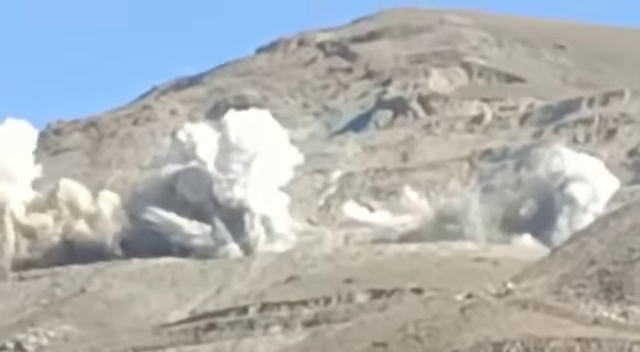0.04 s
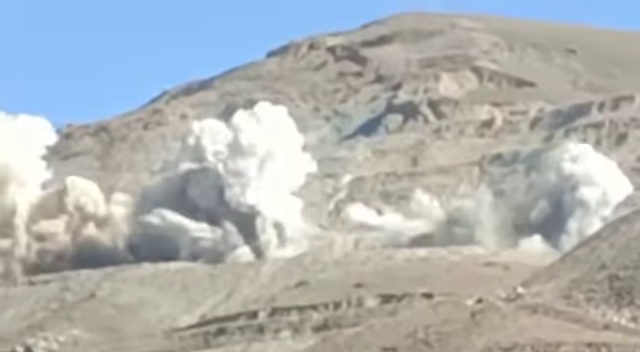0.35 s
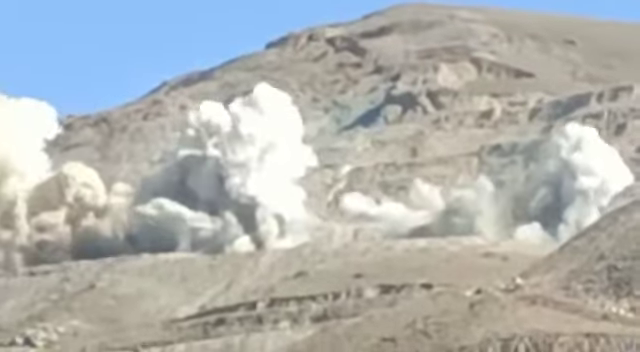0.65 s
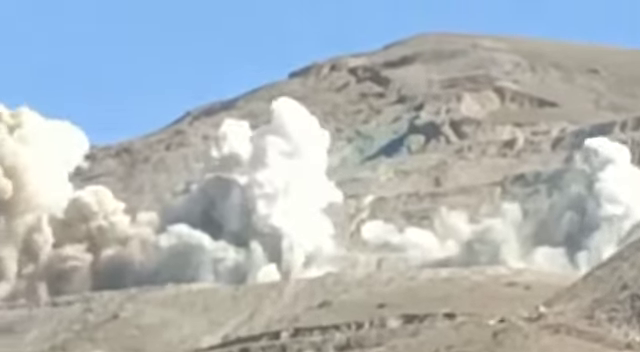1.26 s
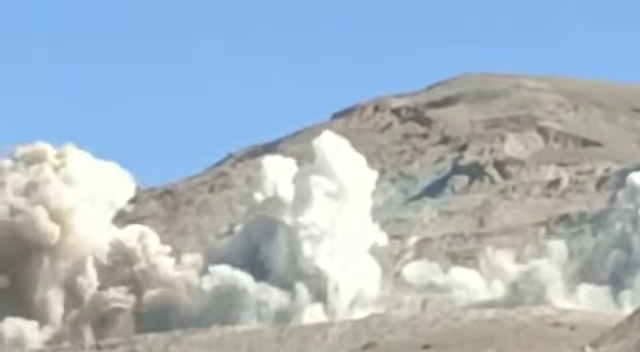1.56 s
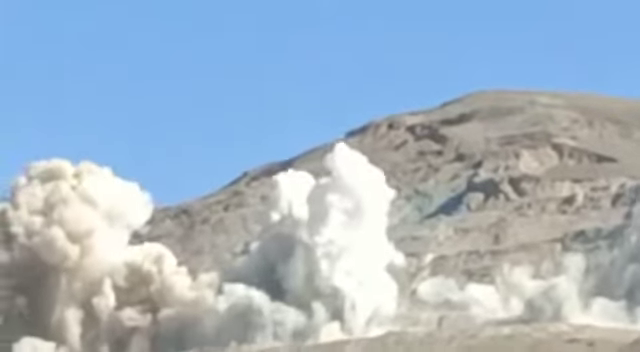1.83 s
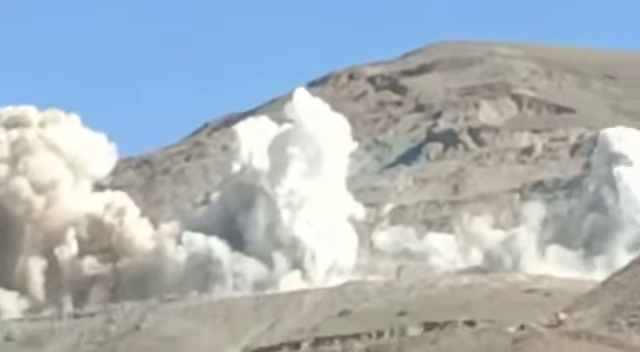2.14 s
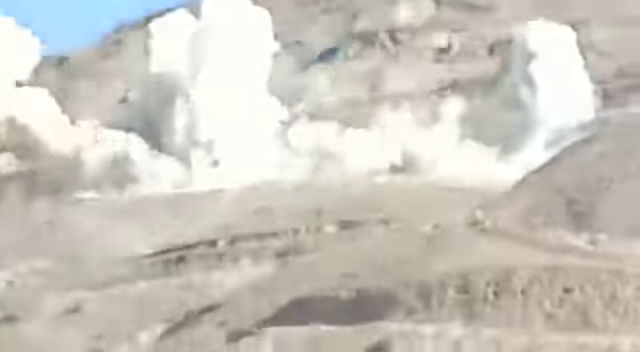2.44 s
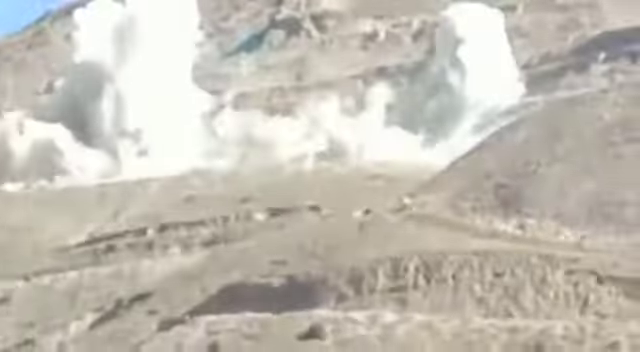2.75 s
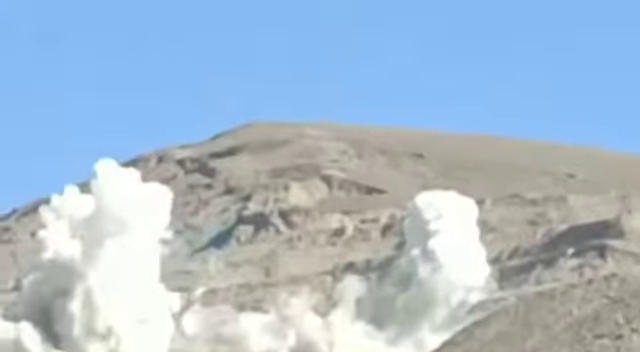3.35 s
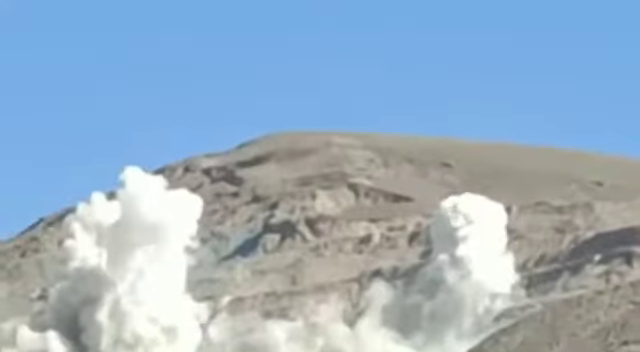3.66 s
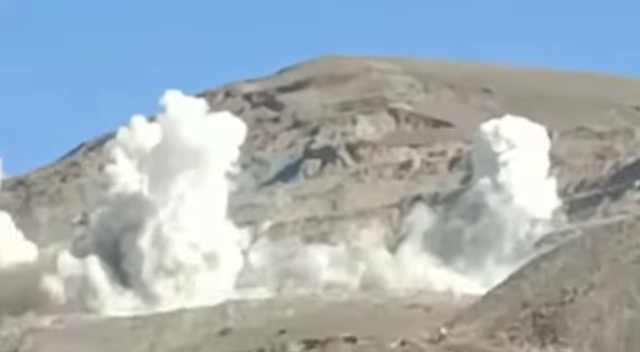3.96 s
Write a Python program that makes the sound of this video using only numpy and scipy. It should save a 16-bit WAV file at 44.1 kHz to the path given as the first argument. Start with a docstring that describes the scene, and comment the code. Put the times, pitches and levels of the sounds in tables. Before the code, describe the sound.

Explosions thud on a far hillside, cracking sharply and rumbling on after a quiet start.

```python
"""An open mine in light wind, where a row of charges fires on a far hillside.
After two quiet seconds the pressure waves arrive as a volley of thuds, each a push and a suction.
A quick group of charges merges into one boom, and the slopes scatter the volley into a rolling rumble.
Steep shocks ride on top as sharp cracks, and their echoes come back from the rock faces."""
import sys
import numpy as np
from scipy import signal
from scipy.fft import rfft, irfft
from scipy.io import wavfile
from scipy.ndimage import uniform_filter1d, minimum_filter1d

SR = 44100
rng = np.random.default_rng(int(sys.argv[2]) if len(sys.argv) > 2 else 0)


def generate_wav(signal):
    """Clip the signal to [-1, 1] and save it as 16-bit WAV at the path in sys.argv[1]."""
    frames = np.transpose(np.atleast_2d(signal))
    scaled = np.clip(frames, -1, 1) * 32767
    pcm = np.round(scaled).astype(np.int16)
    wavfile.write(sys.argv[1], SR, pcm)


N = 176400
TIME = np.arange(N) / SR
FREQS = np.fft.rfftfreq(N, 1 / SR)


def amp(db):
    """Decibels to gain."""
    return 10 ** (np.asarray(db) / 20)


def unit(x):
    """Scales to rms 1."""
    return x / np.sqrt(np.mean(x ** 2) + 1e-20)


def read(points, hz):
    """Reads a spectrum on a log-frequency axis."""
    f, value = np.transpose(points)
    return np.interp(np.log(hz + 1), np.log(f), value)


def curve(points, column=1):
    """Reads one column of a time curve at every sample."""
    rows = np.transpose(points)
    return np.interp(TIME, rows[0], rows[column])


def pan(db):
    """Stereo gains for a balance of left over right."""
    return amp(np.array([[.5], [-.5]]) * db)


def add(mix, start_s, sound):
    """Mixes a sound in at a time."""
    part = mix[..., round(start_s * SR):][..., :sound.shape[-1]]
    part += sound[..., :part.shape[-1]]


def lumps(depth_db, length_s):
    """A random gain that wanders on a given time scale."""
    slow = irfft(rfft(rng.standard_normal(N)) * np.exp(-(FREQS * length_s) ** 2), N)
    return unit(amp(depth_db * unit(slow)))


def convolve(x, response):
    """Plays a sound through a response."""
    return signal.fftconvolve(np.atleast_2d(x), np.atleast_2d(response), axes=1)[:, :N]


def coloured(x, colour, size=2048):
    """Minimum-phase EQ, so that fronts stay sharp."""
    log_gain = np.log(amp(read(colour, abs(np.fft.fftfreq(size, 1 / SR)))))
    spectrum = np.exp(np.conj(signal.hilbert(log_gain)))
    return convolve(x, np.fft.ifft(spectrum).real)


# Stereo width of the hillside. Each row: frequency in Hz, side over mid in dB.
HILL_WIDTH = [(30, -26), (70, -23.5), (125, -22.5), (250, -21.5), (500, -7), (1000, -9), (2000, -3),
              (4000, -0.5), (15000, 7)]
# Its balance. Each row: frequency in Hz, left over right in dB.
HILL_LEAN = [(60, 0.65), (250, -.5), (600, 0.1), (1400, 1.2), (3000, 4.1), (7000, -0.5), (15000, -5)]
def noise(colour, width=HILL_WIDTH, lean=HILL_LEAN):
    """Diffuse stereo noise at rms 1: narrow in the bass, wide in the treble."""
    mid, side = rfft(rng.standard_normal((2, N)))
    share = amp(read(width, FREQS))
    pair = np.array([mid + share * side, mid - share * side]) / np.hypot(1, share)
    return unit(irfft(pair * pan(read(lean, FREQS)) * amp(read(colour, FREQS)), N))


# The whine's glide. Each row: time in seconds, pitch in Hz.
WHINE_PITCH = [(0, 1352), (.6, 1385), (1.3, 1425), (1.9, 1448), (4, 1470)]
def whine():
    """A far, barely audible tone creeps upward."""
    return amp(-84) * np.sin(2 * np.pi * np.cumsum(curve(WHINE_PITCH)) / SR)


# Rustles. Each row: centre time in seconds, level in dB, spread in seconds, centre frequency in Hz.
RUSTLES = [(.605, -72, 0.011, 2900), (0.675, -71, 0.021, 890), (.668, -73, .008, 3100),
           (.77, -76, .006, 3300), (1.388, -71, 0.057, 700), (1.76, -72.5, 0.017, 1800),
           (1.88, -69, 0.038, 2720)]
def rustles():
    """Faint, soft-edged puffs of noise close by."""
    out = np.zeros((2, N))
    for at, db, spread, hz in RUSTLES:
        swell = np.exp(-((TIME - at) / spread) ** 2 / 2)
        out += amp(db) * swell * noise([(hz / 5, -12), (hz, 0), (hz * 2, -14), (hz * 6, -32)])
    return out


# Gusts. Each row: time in seconds, level in dB.
GUSTS = [(0, -47.5), (.38, -54), (.5, -55.5), (.68, -52.5), (.8, -54.5), (1.0, -49), (1.12, -47),
         (1.25, -53), (1.5, -48), (1.7, -50), (1.85, -44.5), (4, -56)]
# Tone of the wind and of the still air. Each row: frequency in Hz, relative level in dB.
WIND_EQ = [(12, -9.5), (30, -2.5), (46, 0.5), (65, -6.5), (100, -17.5), (160, -22), (300, -30.5),
           (600, -39), (2000, -69.5)]
AIR_EQ = [(100, -8), (380, -3), (600, -11), (1200, -9.5), (2500, -14), (5000, -23), (9000, -25.5),
          (15000, -25)]
# Stereo width of both. Each row: frequency in Hz, side over mid in dB.
BED_WIDTH = [(60, -4), (150, -5.5), (380, -6.5), (950, 0), (2380, 1), (5980, 1.5), (15000, -1)]
# Their balance. Each row: frequency in Hz, left over right in dB.
BED_LEAN = [(60, 0), (150, -2.5), (380, 0.5), (950, -0.5), (2380, 1.0), (5980, -0.5), (15000, 2.5)]
def wind():
    """Light wind buffets the microphone over the steady hush of the air."""
    gusts = amp(curve(GUSTS)) * noise(WIND_EQ, BED_WIDTH, BED_LEAN)
    gusts *= lumps(depth_db=-1.5, length_s=0.043)
    return gusts + amp(-69.5) * noise(AIR_EQ, BED_WIDTH, BED_LEAN)


# Swells of the roll. Each row: time in seconds, bass level in dB, mid level in dB.
ROLL_LEVELS = [(1.987, -52, -57), (2.003, -29.5, -34), (2.06, -24, -34), (2.15, -22, -34.5),
               (2.2, -20, -29.5), (2.3, -19, -30), (2.38, -24.5, -35), (2.47, -26, -37), (2.55, -19, -28.5),
               (2.62, -24, -31), (2.72, -15, -31.5), (2.82, -13, -27), (2.94, -20, -33.5),
               (3.1, -23.5, -35.5), (3.28, -24.5, -35.5), (3.37, -22, -34), (3.55, -25, -35.5),
               (3.72, -31.5, -42.5), (3.745, -24, -34), (3.82, -26, -40), (3.87, -21.5, -34),
               (4.0, -26.5, -36)]
# Tone of its two layers. Each row: frequency in Hz, relative level in dB.
BASS_EQ = [(12, -14.5), (28, 6.5), (60, 0.5), (120, -6.5), (200, -7.5), (290, -9), (420, -13.5),
           (650, -23.5), (1500, -79)]
MIDS_EQ = [(150, -17.5), (350, -3), (550, 0), (750, 8), (1000, 6.5), (1300, -1.5), (1800, -5.5),
           (2300, -16), (2900, -26), (3600, -30.5), (4500, -46), (7000, -76), (16000, -92)]
def rumble(fade_in_s=.008):
    """The slopes return the volley as a lumpy bass roll with a dull roar above it."""
    flutter = lumps(depth_db=1.2, length_s=.005)
    bass = amp(curve(ROLL_LEVELS, column=1)) * noise(BASS_EQ)
    roar = amp(curve(ROLL_LEVELS, column=2)) * noise(MIDS_EQ) * flutter
    clumps = lumps(depth_db=0.5, length_s=0.031)  # echoes arrive in clumps
    first_wave_s = BLAST_WAVES[0][0]
    fade_in = np.sin(np.pi / 2 * np.clip((TIME - first_wave_s) / fade_in_s, 0, 1)) ** 2
    return (bass + roar) * clumps * fade_in


# Slaps off the rock. Each row: peak time in seconds, level in dB, rise and fall time constants
# in seconds, left over right in dB, treble shelf in dB.
ROCK_ECHOES = [(2.841, -27.5, 0.0083, .012, -11.5, 8), (2.905, -36.5, 0.07, 0.064, -4.5, 4),
               (3.087, -30, 0.0044, 0.006, -6, -22), (3.102, -42, .003, 0.011, 0, -6),
               (3.1976, -24, 0.00075, .0025, -5.5, -29), (3.2095, -38.5, .001, 0.009, 1, -31),
               (3.491, -51.5, 0.077, 0.085, -3, -24.5)]
# Their tone before the shelf. Each row: frequency in Hz, relative level in dB.
ECHO_EQ = [(500, -22.5), (1500, -1), (2500, -1), (3200, -1.5), (4200, -3.5), (5000, -13), (5800, -11.5),
           (7000, -21.5), (9000, -35.5), (15000, -41)]
def echoes():
    """Rock faces throw the cracks back, smeared into bright bursts of noise."""
    out = np.zeros((2, N))
    for at, db, rise, fall, pan_db, shelf_db in ROCK_ECHOES:
        colour = [(hz, level + shelf_db * np.clip((hz - 5500) / 4000, 0, 1)) for hz, level in ECHO_EQ]
        envelope = np.exp(-np.maximum((at - TIME) / rise, (TIME - at) / fall))
        out += amp(db) * pan(pan_db) * envelope * noise(colour)
    return out * lumps(depth_db=2.5, length_s=0.0022)


# Tone of the near reflections and of the valley tail. Each row: frequency in Hz, relative level in dB.
NEAR_EQ = [(300, 2.5), (2000, -0.5), (3200, -2.5), (4500, 2.5), (8000, 1.5), (14000, 2.5)]
VALLEY_EQ = [(300, 4), (1500, -6), (3200, -3), (4500, 8), (6000, 7), (9000, -0.5), (14000, -1.5)]
# The valley's decay. Each row: frequency in Hz, seconds to fall by 60 dB.
VALLEY_T60 = [(300, 0.98), (2000, 1.6), (4000, 1.3), (6000, 1), (9000, 2.1), (15000, 1.8)]
def reverb():
    """The mine's answer to a crack: a quick splash, near reflections and a long valley tail."""
    hz, age, bands = signal.stft(noise(VALLEY_EQ), SR, nperseg=256)
    bands = bands * amp(-60 * age / read(VALLEY_T60, hz)[:, None])
    valley = unit(signal.istft(bands, SR, nperseg=256)[1][:, :N]) * pan(db=-3.0)
    splash = tail([(20, 0), (20000, 0)], t60_s=.02)
    near = tail(NEAR_EQ, t60_s=0.35)
    response = (splash + amp(-3) * near + amp(-2.5) * valley) / np.sqrt(N)
    return response * lumps(depth_db=1.0, length_s=0.012)


def tail(colour, t60_s):
    """Scattered reflections that die away, at rms 1."""
    return unit(noise(colour) * amp(-60 * TIME / t60_s))


# Crack hits. Each row: start in seconds, level in dB, left over right in dB, treble cut-off in Hz.
CRACK_HITS = [(2.002, -5, 0, 850), (2.5385, -10, 0, 800), (2.6862, 0, 3.5, 1700), (2.7524, 6, 3, 6000),
              (2.7665, -7, 0, 5000), (2.7795, -8, 2, 3500), (2.7895, -3, 2, 3000)]
# Their bite. Each row: frequency in Hz, gain in dB.
CRACK_EQ = [(100, -12), (500, -5), (950, 1), (1500, 1), (2150, 3), (2750, 0), (3300, 2), (3900, -5),
            (4600, -10), (5700, -10), (7000, -22), (9500, -22), (15000, -25)]
def cracks(shock_s=.00022, bounce_s=.0013, bounce_db=-5):
    """Steep shocks, each doubled by a ground bounce, ring out across the valley."""
    t, shocks = np.arange(0, .01, 1 / SR), np.zeros((2, N))
    front = (1 - t / shock_s) * np.exp(-t / shock_s)
    for start, db, pan_db, top_hz in CRACK_HITS:
        lowpass = signal.butter(2, top_hz, fs=SR)
        shock = amp(db) * pan(pan_db) * signal.lfilter(*lowpass, front)
        add(shocks, start, shock)
        add(shocks, start + bounce_s, amp(bounce_db) * shock)
    direct = coloured(shocks, CRACK_EQ)
    return direct + convolve(direct, reverb())


# Tone of the boom's body and of its grit. Each row: frequency in Hz, relative level in dB.
BOOM_EQ = [(40, -22.5), (90, -13.5), (135, 7), (200, 2.5), (290, -3.5), (400, -23), (900, -76.5)]
GRIT_EQ = [(1500, -18), (3500, 0), (4800, -8), (6200, -4.5), (7500, -13.5), (9500, -37.5), (15000, -42)]
def boom(at_s=2.18, rise_s=0.0079, hold_s=0.097, fall_s=0.074, grit_at_s=2.198, grit_fade_s=.016):
    """Charges too close together to tell apart merge into one boom, with a short gritty hiss on top."""
    age = TIME - at_s
    envelope = np.exp(np.minimum(0, np.minimum(age / rise_s, (hold_s - age) / fall_s)))
    grit = np.exp(-abs(TIME - grit_at_s) / grit_fade_s) * noise(GRIT_EQ)
    grit *= lumps(depth_db=-1, length_s=0.00183)
    return amp(-17.5) * envelope * noise(BOOM_EQ) + amp(-59) * grit


# The volley. Each row: arrival in seconds, level in dB, length of the push in seconds.
BLAST_WAVES = [(1.9879, -12.5, 0.0033), (1.996, -5, 0.0067), (2.013, -2, 0.0035), (2.173, -6.5, 0.0032),
               (2.194, -4, 0.0039), (2.210, -4.5, 0.0039), (2.248, -4, 0.0086), (2.266, -9.5, 0.004),
               (2.300, -5, .006), (2.483, -6, 0.0062), (2.516, -7.5, 0.0053), (2.5365, 0, 0.0076),
               (2.635, 0.5, 0.0086), (2.67, -2, 0.0092), (2.683, -5, .008), (2.707, -0.5, 0.0051),
               (2.773, -2.5, 0.0096), (2.815, -5.5, 0.0041), (2.841, -9, 0.0083), (2.859, -6.5, 0.0068),
               (3.85, -5.5, 0.01), (3.861, -14, 0.012), (3.940, -12.5, 0.0043)]
# Tone of the ground scatter. Each row: frequency in Hz, relative level in dB.
SCATTER_EQ = [(20, -15.5), (60, -4), (130, 14.5), (280, -1.5), (500, -9.5), (900, -8), (1600, -16),
              (2500, -21.5), (4000, -85), (8000, -82)]
def blasts(air_hz=320, low_cut_hz=12, scatter_db=-20, scatter_t60_s=0.43):
    """Each charge sends a push and a suction, and the ground along the path smears the wave."""
    t, waves, scatter_energy = np.arange(0, .15, 1 / SR), np.zeros(N), np.zeros(N)
    air = signal.butter(2, air_hz, fs=SR)  # distance rounds the front
    low_cut = signal.butter(1, low_cut_hz, "high", fs=SR)  # the microphone loses the deepest part
    smear = amp(-60 * TIME / scatter_t60_s) * (1 - np.exp(-TIME / 0.0027))
    for start, db, push_s in BLAST_WAVES:
        push = np.sin(np.pi * np.clip(t / push_s, 0, 1))
        suction = 0.37 * np.sin(np.pi * np.clip((t / push_s - 1) / 1.275, 0, 1))  # weaker and longer
        thud = signal.lfilter(*low_cut, signal.lfilter(*air, push - suction))
        add(waves, start, amp(db) * thud)
        add(scatter_energy, start, (amp(db) * smear) ** 2)
    return waves + amp(scatter_db) * np.sqrt(scatter_energy) * noise(SCATTER_EQ)


def scene():
    """The quiet outdoor bed, with the volley and its echoes on top."""
    bed = wind() + rustles() + whine()
    return bed + blasts() + boom() + rumble() + cracks() + echoes()


def record(dry, ceiling=.9, top_hz=15550):
    """A fast limiter holds the loudest peaks, then a steep low-pass trims the top."""
    needed_gain = ceiling / np.maximum(abs(dry), ceiling)
    held_gain = minimum_filter1d(needed_gain, size=41)
    gain = uniform_filter1d(uniform_filter1d(held_gain, size=21), size=21)
    return signal.sosfilt(signal.ellip(12, .1, 90, top_hz, fs=SR, output="sos"), dry * gain)


dry = scene()
out = record(dry)
generate_wav(out)
```